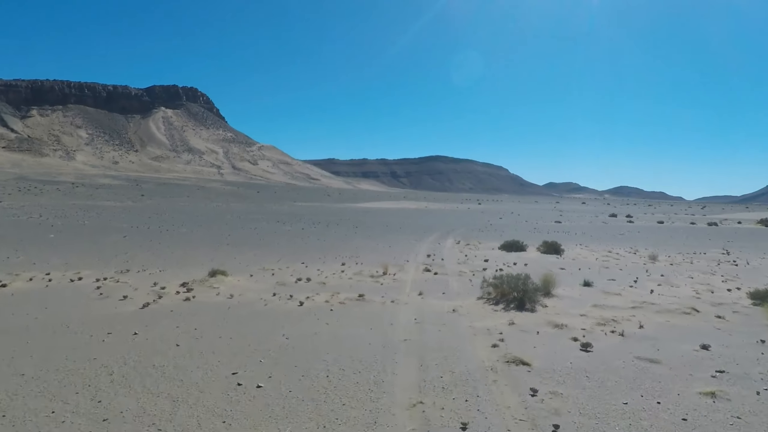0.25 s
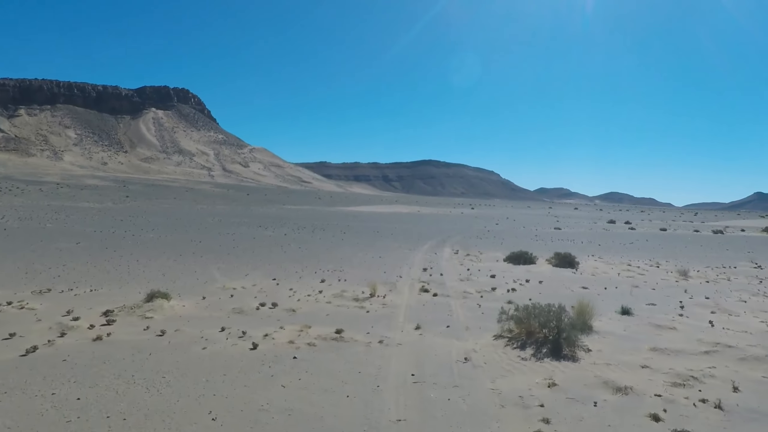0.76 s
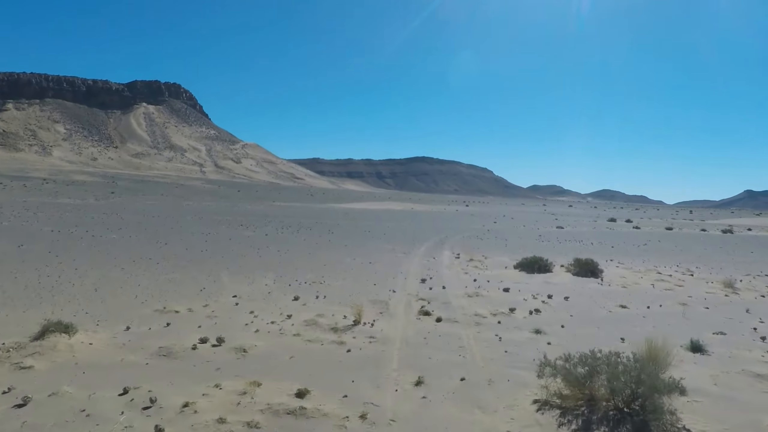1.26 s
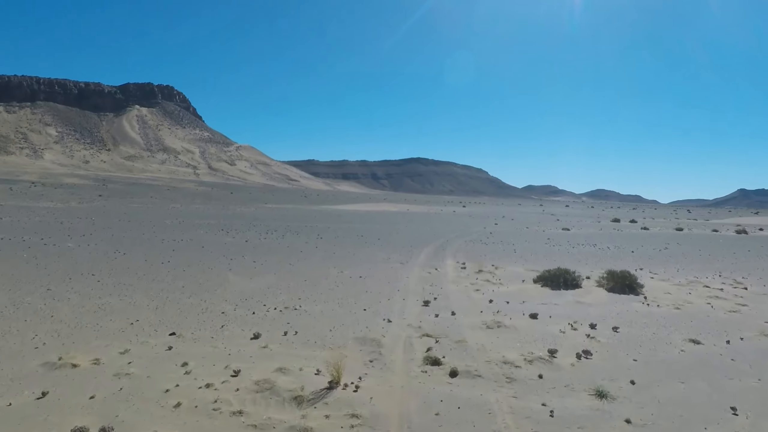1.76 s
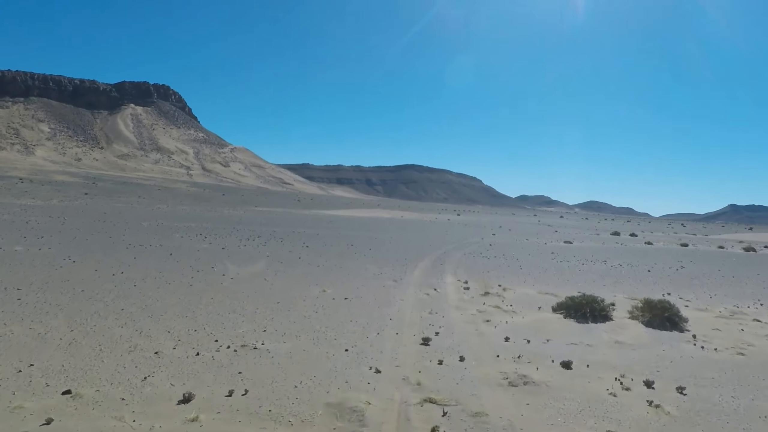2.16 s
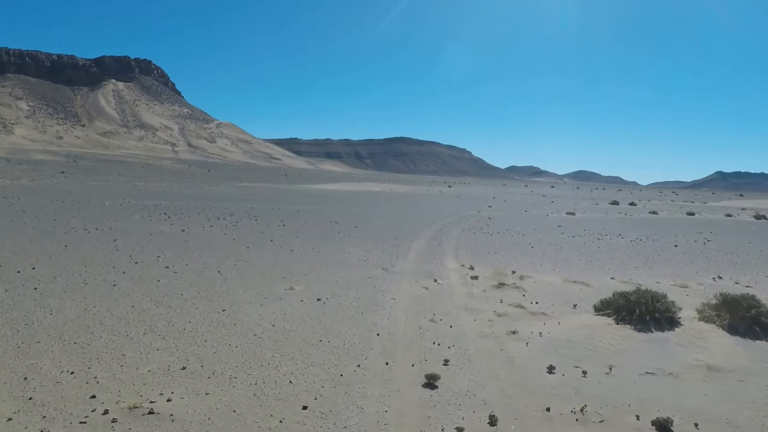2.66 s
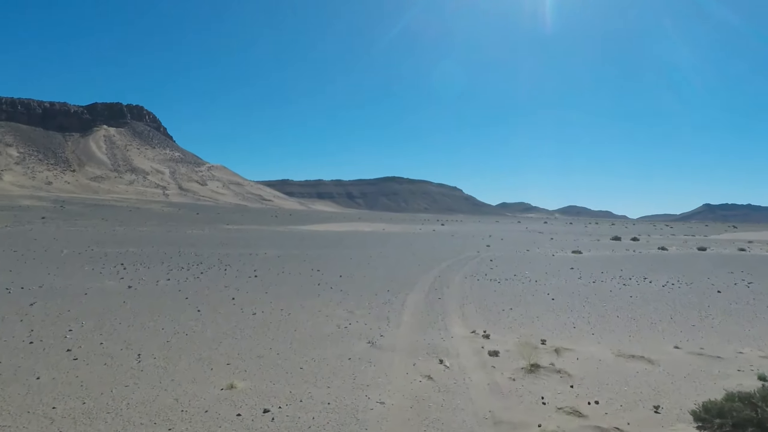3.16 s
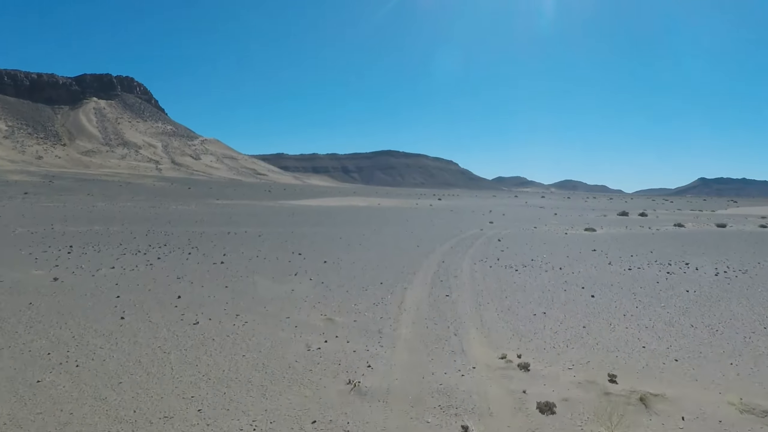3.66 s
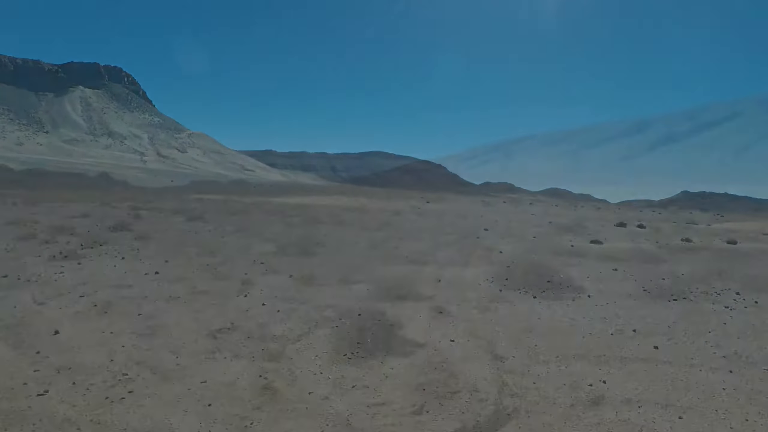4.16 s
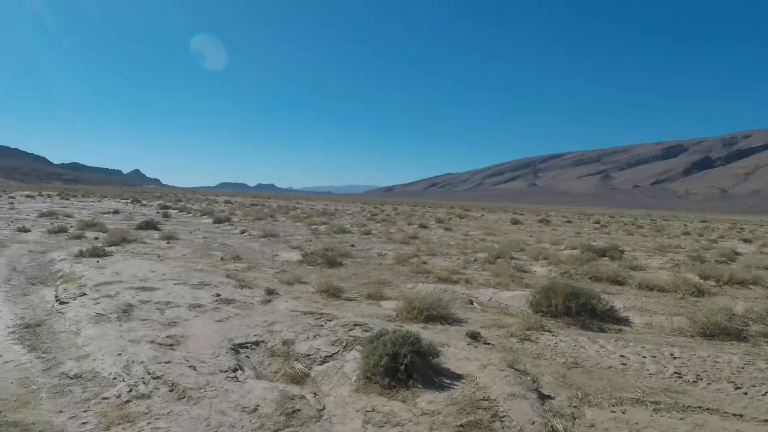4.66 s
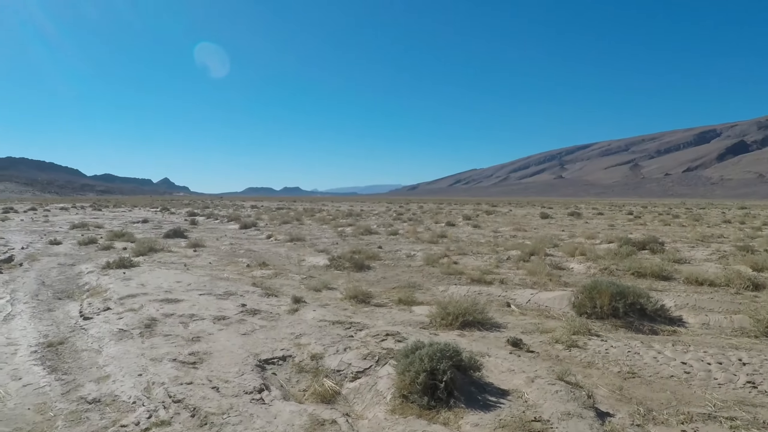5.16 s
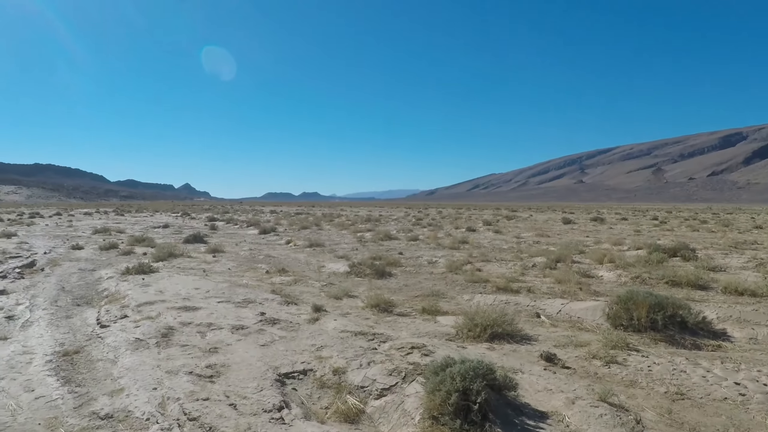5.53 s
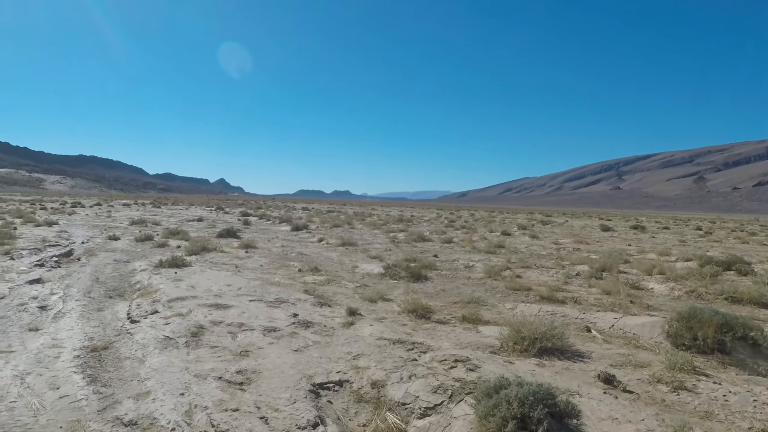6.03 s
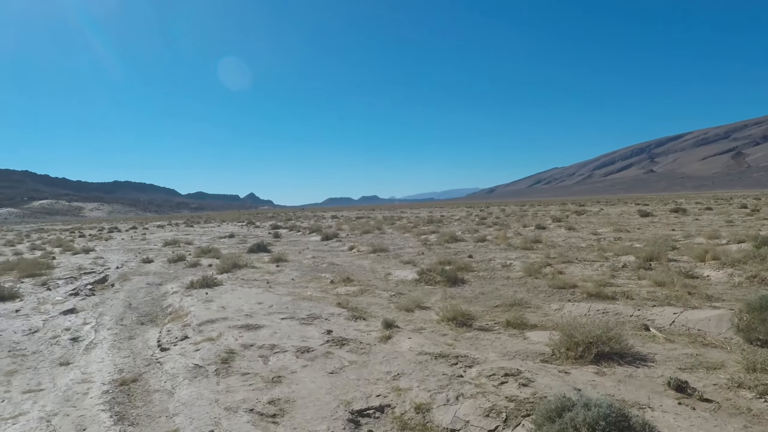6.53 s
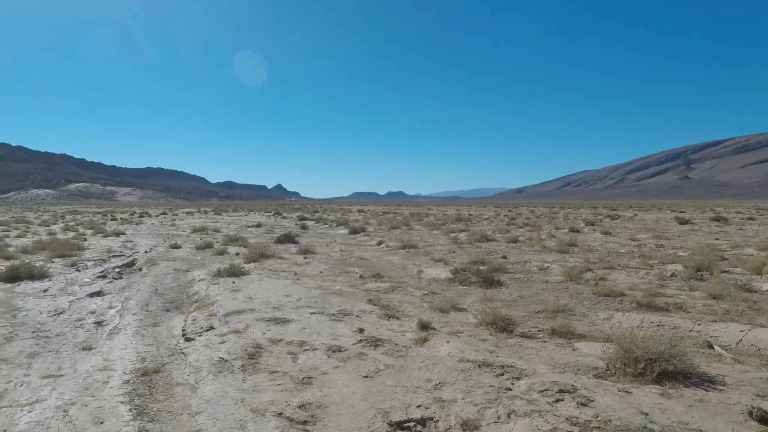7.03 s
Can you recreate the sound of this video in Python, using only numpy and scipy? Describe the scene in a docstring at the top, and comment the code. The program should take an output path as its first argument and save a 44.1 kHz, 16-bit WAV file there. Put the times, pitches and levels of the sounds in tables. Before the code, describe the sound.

A truck rolls over loose desert gravel, gritty crunching and stone knocks over heavy low boom, then quieter bumping with loose metal rattles and tiny tinks.

```python
"""On a desert track a truck rolls along, heard at its body: the cab booms as two low tones that later beat, the engine
hums as a sine, and gravel crunches under the tyres as grainy filtered noise with brighter bursts. Stones clunk the floor
pan as force through resonances; one squeals along the metal as a gliding tone. On slower, bushy ground the crunch
yields to a steady roar, a regular low thump, rattling panels and small metal tinks, which are short sines."""
import sys
import numpy as np
from scipy import signal
from scipy.fft import rfft, irfft, next_fast_len
from scipy.io import wavfile
from scipy.ndimage import uniform_filter1d, map_coordinates

SR = 44100
rng = np.random.default_rng(int(sys.argv[2]) if len(sys.argv) > 2 else 0)


def bounce(signal):
    """Save signal as a 16-bit WAV file at the path given by the first command-line argument."""
    frames = np.transpose(np.atleast_2d(signal))
    limited = np.clip(frames, -1, 1)
    pcm = np.round(limited * 32767).astype(np.int16)
    wavfile.write(sys.argv[1], SR, pcm)


N = 321489
T = np.arange(N) / SR  # s

# Cab boom, rms level: time_s, level_db
BOOM_LEVEL = [(0, -35.5), (.11, -26.5), (.23, -33.5), (.32, -26), (.72, -26.5), (.87, -37), (.99, -25.5),
              (1.3, -29.5), (1.37, -36), (1.41, -28.5), (1.59, -38), (1.73, -21.5), (1.81, -40),
              (1.96, -24.5), (2.25, -33), (2.34, -39), (2.45, -27.5), (2.68, -34.5), (2.77, -31),
              (3.12, -25.5), (3.2, -53), (3.28, -28.5), (3.44, -29.5), (3.56, -25.5), (3.82, -39),
              (3.9, -26.5), (4.3, -34), (4.7, -38), (5.1, -32), (5.9, -30.5), (6.5, -34), (6.9, -35),
              (7.29, -32.5)]
# Cab boom, mean pitch: time_s, pitch_hz
BOOM_PITCH = [(0, 41), (3.8, 41.01), (4.2, 42.27), (4.9, 37.6), (5.7, 40.94), (6.6, 39.52), (7.29, 39.36)]
# Second, lower boom, which opposes the first at each row, for deep or shallow dips: time_s, relative_level_db
BOOM_BEAT = [(3.95, -27), (4.1, -4), (4.25, -1), (4.43, -3.5), (4.6, -3), (4.775, 0), (5.045, 2.5),
             (5.24, -1), (5.5, -17), (5.78, -20), (6.1, -3), (6.355, -1.5), (6.605, 4.5), (6.92, 7),
             (7.22, 0.5), (7.5, -2)]
# Low frame judder, spectrum: frequency_hz, density_db_per_hz (relative)
JUDDER_SPECTRUM = [(4.7, -38.5), (8.0, -4.5), (32, 15), (42, -33.5), (70, -120)]
# Rumble above the judder, spectrum: frequency_hz, density_db_per_hz (relative)
RUMBLE_SPECTRUM = [(25, -24), (45, 8), (70, 0.5), (95, -12.5), (150, -17), (167, -21.5), (190, -24.5),
                   (330, -24.5), (450, -34), (540, -61)]
CALM_ROAR_DB = -60  # tyre roar on smooth ground
JUDDER_DB, JUDDER_GROWTH = -46, 1.34  # level on smooth ground; dB per dB of roar
RUMBLE_DB, RUMBLE_GROWTH = -48, 0.72  # the same for the rumble

# Tyre noise: time_s, crunch_level_db, roar_level_db
TYRE_LEVELS = [(0, -55.5, -58.5), (.38, -55, -58), (.93, -48, -57), (1.32, -50, -57), (1.58, -47, -53.5),
               (1.85, -50.5, -50), (2, -50, -56), (2.27, -53.5, -56), (2.44, -46, -52.5), (2.78, -45, -51),
               (3.02, -49, -47), (3.3, -50, -53), (3.42, -53.5, -53), (3.71, -48.5, -53),
               (4.22, -50, -57.5), (4.38, -52, -57.5), (4.52, -57.5, -62), (5.1, -61.5, -62.5),
               (5.48, -59.5, -61.5), (5.9, -60.5, -62), (6.6, -57.5, -60), (6.94, -60, -62),
               (7.29, -56.5, -60)]
# Loose gravel on the ground: time_s, loose_share (0-1)
LOOSE_GRAVEL = [(0.1, 0.35), (.7, 0.92), (4.4, 0.95), (4.65, 0.12)]
# Crunch on loose gravel, spectrum: frequency_hz, density_db_per_hz (relative)
GRAVEL_SPECTRUM = [(710, -41.5), (1200, -7.5), (1450, -3), (1750, -5.5), (2100, -6), (2950, -1.5),
                   (3300, -5.5), (3700, -6), (4200, -8), (4380, -18), (4700, -14), (5500, -22),
                   (6600, -31.5), (7050, -25.5), (7600, -32), (8450, -30.5), (9500, -38.5), (13600, -47.5),
                   (15600, -57.5)]
# Crunch on firmer dirt, spectrum: frequency_hz, density_db_per_hz (relative)
DIRT_SPECTRUM = [(710, -22.5), (1200, -12), (1440, -17.5), (1590, -1.5), (2050, -2.5), (2570, 5),
                 (3600, -7.5), (4300, -20.5), (5500, -16.5), (6700, -29), (13000, -34), (15600, -40)]
# Tyre roar, spectrum: frequency_hz, density_db_per_hz (relative)
ROAR_SPECTRUM = [(250, -41.5), (430, -5), (496, -10), (590, -2.5), (867, -0.5), (1060, 0), (1400, -6.5),
                 (1820, -42.5), (3080, -120)]
# Modes of the sheet-metal panels: pitch_hz, width_hz, level_db
PANEL_MODES = [(1605, 313, -9), (2140, 102, 3), (2479, 57, -1.5), (2780, 41, 13.5), (2876, 203, -4),
               (3140, 51, 16.5), (3336, 390, -20)]
# Modes of the floor pan: pitch_hz, width_hz, level_db
FLOOR_PAN_MODES = [(353, 320, -4.5), (561, 71, 0.5), (769, 90, -5.5), (897, 67, 2.5), (1109, 106, 2),
                   (1326, 143, 2.5)]

# Bigger stones bursting under the tread: start_s, peak_db (nominal)
CRUNCHES = [(0.008, -36), (0.7477, -44), (0.7749, -34.5), (0.8194, -36.5), (0.8769, -35.5), (0.9128, -46),
            (0.9622, -40), (1.046, -31.5), (1.08, -41), (1.1059, -46), (1.28, -36), (1.3359, -39),
            (1.4202, -43), (1.5078, -31.5), (1.693, -32.5), (2.0123, -37), (2.447, -35), (2.6449, -32),
            (3.0569, -32), (3.0874, -25.5), (3.3596, -50), (3.5154, -33), (3.5972, -37), (4.013, -33.5),
            (4.0994, -35), (4.2447, -38)]
# Stone burst, spectrum: frequency_hz, density_db_per_hz (relative)
BURST_SPECTRUM = [(900, -47), (1450, -0.5), (2000, -8.5), (2800, 0), (3250, -5.5), (3700, 1), (4200, -8.5),
                  (4450, -22), (5500, -20), (7000, -32), (12000, -47)]
BURST_CREST_DB = 9.5  # peak over rms
BURST_RISE_S, BURST_T60_S = 0.00059, 0.12

# Stones thrown against the underside; from 4.68 s, low floor-pan knocks, mostly under the rattles:
# start_s, peak_db, struck_part_hz, snap_relative_db
STONES = [(0.996, -36, 3050, -32), (1.468, -39, 2530, -25), (1.655, -34.5, 2562, -14.5),
          (1.66, -39, 805, -38), (1.7, -40.5, 1000, -36), (1.844, -30, 1020, -36), (1.876, -33, 640, -39),
          (2.219, -35.5, 1024, -40), (2.67, -44.5, 2796, -6), (2.78, -36.5, 1404, -29),
          (2.875, -27.5, 930, -34), (2.875, -33.5, 2940, -26), (3.074, -32.5, 895, -15.5),
          (3.083, -32, 2446, -21), (3.089, -27.5, 3300, -11), (3.099, -31, 3090, -11),
          (3.14, -35.5, 691, -36), (3.275, -49, 2917, -2.5), (3.357, -36, 1280, -32),
          (3.354, -38, 2300, -15), (3.528, -27, 1720, -26), (3.535, -26.5, 2180, -21),
          (3.552, -31, 2830, -24.5), (3.619, -41.5, 960, -12.5), (3.976, -40.5, 2770, -13),
          (4.006, -38.5, 1040, -16), (4.094, -44, 750, -30), (4.17, -52, 716, -26),
          (4.236, -37.5, 925, -19), (4.377, -48, 2800, -4), (4.68, -44, 1100, -35), (4.73, -47, 1045, -36),
          (5.345, -43.5, 1085, -36), (5.71, -48.5, 900, -30), (5.835, -45.5, 997, -35),
          (7.183, -46, 745, -36), (7.205, -46.5, 1150, -36)]
# Knocks of loose panels: start_s, peak_db, snap_relative_db
RATTLES = [(4.678, -41, -38), (4.7296, -41, -15.5), (4.77, -53, -24), (4.9484, -46.5, -13),
           (4.959, -42.5, -28), (4.987, -46, -17), (5.017, -46.5, -10), (5.0404, -42, -31),
           (5.069, -43.5, -22), (5.1537, -33.5, -18.5), (5.2677, -37.5, -28), (5.2908, -42, -23),
           (5.3413, -41.5, -15.5), (5.3697, -35.5, -18), (5.3985, -40, -18), (5.493, -41.5, -22),
           (5.5196, -44.5, -31), (5.7726, -42.5, -31), (5.8268, -41.5, -16), (6.144, -54, -2),
           (6.193, -40.5, -33), (6.2743, -39.5, -21.5), (6.3077, -45, -19.5), (6.367, -41, -21),
           (6.5414, -35, -20.5), (6.56, -38, -30), (6.6685, -35.5, -18), (6.86, -48, -14),
           (7.035, -53.5, -5), (7.055, -48, -9), (7.195, -45, -20.5), (7.2537, -42.5, -16.5)]
# Treble snap of a blow, spectrum: frequency_hz, density_db_per_hz (relative)
SNAP_SPECTRUM = [(3000, -38), (4500, 3.5), (7000, -4.5), (11000, -15), (16000, -13.5)]
STONE_T60_S = 0.19  # chatter of the force on a part at 1 kHz
STONE_T60_POWER = 0.39  # power of the pitch by which higher parts stop sooner
RATTLE_T60_S, RATTLE_HAZE_T60_S = 0.1, 0.06
# A snap is a sharp click and a softer haze
CLICK_T60_S, STONE_HAZE_DB, STONE_HAZE_T60_S = 0.016, -11, 0.11
STONE_STRIKE, RATTLE_STRIKE = 4.3, 7  # first contact, relative to the chatter

# Engine hum: time_s, pitch_hz, level_db
ENGINE = [(0, 60.9, -49.5), (1, 61.1, -47.5), (1.4, 62.4, -41.5), (1.62, 62.9, -31), (1.9, 63.4, -52),
          (2.5, 65.6, -39), (3, 66.8, -46.5), (3.6, 66.6, -49.5), (4.2, 67.9, -62), (4.5, 68.8, -71),
          (5.5, 70, -55.5), (6.4, 71.65, -50.5), (7.29, 71, -60)]
# Faint drive-line drone: time_s, pitch_hz, level_db
DRONE = [(0, 165, -77.5), (2.2, 165.2, -77), (2.6, 166.1, -64), (3.3, 166.6, -72.5), (3.9, 167.7, -66),
         (4.3, 166, -67), (4.6, 167.7, -77.5), (5.6, 168.3, -69), (6.4, 162.7, -71), (7.29, 163.8, -75.5)]

SQUEAL_START_S, SQUEAL_SWELL_S, SQUEAL_T60_S = 3.078, 0.019, 0.08
SQUEAL_DB, OVERTONE_DB = -27.5, -22  # mean level at the top of the swell; overtone relative to it
SQUEAL_HZ, SQUEAL_LOW_HZ, SQUEAL_FALL_HZ_PER_S = 3246, 2860, 17500

THUMP_TIMES = np.arange(4.56, N / SR, .1024)  # s

# Small loose metal parts: start_s, level_db (before the rise), pitch_hz
TINKS = [(1.929, -47, 5760), (3.73, -51, 5950), (4.951, -63, 10200), (5.02, -64, 10500),
         (5.121, -64, 10800), (5.191, -61.5, 10250), (5.671, -59.5, 7600), (6.095, -58, 7330),
         (6.14, -60, 12700), (6.267, -62, 8270), (6.37, -64, 14500), (6.466, -46, 3310),
         (6.931, -57.5, 7330), (6.99, -62, 4860), (7.05, -59.5, 7370)]
TICK_TOP_DB = -67  # limit on a tink's level when it sets the starting tick

# Weak rattles and tinks fall at random on the bushy ground
BUSHY_FROM_S = 4.6
FAINT_RATTLE_DB, FAINT_SNAP_DB, FAINT_TINK_DB = -57.5, -9, -71


def amp(db):
    """Decibel law: the amplitude gain of a level."""
    return 10 ** (np.asarray(db) / 20)


def unit(x):
    """Power normalisation: x at rms 1."""
    return x / np.sqrt(np.mean(x ** 2) + 1e-20)


def curves(rows):
    """Linear interpolation: one value per sample for each column after the time."""
    times, *columns = np.transpose(rows)
    return [np.interp(T, times, column) for column in columns]


def wobble(rate):
    """Band-limited random drift: a smooth curve through rate random knots a second."""
    knots = rng.standard_normal(int(N * rate / SR) + 4)
    return map_coordinates(knots, [T * rate])


def filtered(x, response):
    """Linear filtering: the spectrum of x times a response of frequency."""
    size = next_fast_len(N + SR // 2)
    gain = response(np.fft.rfftfreq(size, 1 / SR))
    return irfft(rfft(x, size) * gain, size)[..., :N]


def coloured(x, spectrum):
    """Spectral shaping: x weighted by dB points over log frequency, at rms 1."""
    f, db = np.transpose(spectrum)

    def response(hz):
        return amp(np.interp(np.log(hz + 1), np.log(f + 1), db, -120, -120))

    return unit(filtered(x, response))


def resonant(x, modes):
    """Modal superposition: parallel resonances of alternating sign, applied twice for dark valleys."""
    f = np.fft.rfftfreq(len(x), 1 / SR)
    once = 0
    for k, (hz, width, db) in enumerate(modes):
        resonance = 1j * f * width / (hz * hz - f * f + 1j * f * width)
        once = once + (-1) ** k * amp(db / 2) * resonance
    return irfft(rfft(x) * once ** 2, len(x))


def tone(hz):
    """Phase integration: a sine of rms 1 that follows a pitch curve."""
    return np.sqrt(2) * np.sin(2 * np.pi * np.cumsum(hz) / SR)


def patchy(x, depth_db, size=4):
    """Random modulation in time and frequency: patches of size x 172 Hz by about 23 ms."""
    cells = signal.stft(x, nperseg=256)[2]
    field = uniform_filter1d(rng.standard_normal(cells.shape), size=size, axis=0)
    field = uniform_filter1d(field, size=8, axis=1)
    return signal.istft(cells * amp(depth_db * unit(field)), nperseg=256)[1][:N]


def knock(modes, rise, t60, strike):
    """Impact excitation: a sharp contact and a short chatter of force through the modes, peak 1."""
    t = np.arange(16384) / SR
    decay = amp(-60 * t / max(t60, .01)) + 0.37 * amp(-60 * t / 0.011)
    force = (1 - np.exp(-(t / rise) ** 2)) * decay * rng.standard_normal(len(t))
    force[0] = strike
    ring = resonant(force, modes)
    return ring / np.abs(ring).max()


def add_at(out, start_s, event):
    """Superposition: an event summed into out from its start."""
    out[round(start_s * SR):][:len(event)] += event


def faint(count):
    """Uniform random arrivals over the bushy ground: rows of start_s, spread_db, share (0-1)."""
    draw = rng.random((count, 3))
    start_s = BUSHY_FROM_S + draw[:, 0] * (N / SR - BUSHY_FROM_S)
    return np.c_[start_s, 6 * (draw[:, 1] - .5), draw[:, 2]]


def cab():
    """Air-mode resonance and beating: two low tones boom; judder and rumble grow with the roar of the ground."""
    upper_turns = np.cumsum(curves(BOOM_PITCH)[0] + 1.254 * wobble(9.6)) / SR
    # the lower boom loses one whole turn from row to row, so the two oppose at each row
    lag_turns = np.interp(T, np.transpose(BOOM_BEAT)[0], np.arange(len(BOOM_BEAT)))
    upper = np.sin(2 * np.pi * upper_turns)
    lower = amp(curves(BOOM_BEAT)[0]) * np.sin(2 * np.pi * (upper_turns - lag_turns))
    boom = np.sqrt(2) * amp(curves(BOOM_LEVEL)[0]) * (upper - lower)

    rough_db = curves(TYRE_LEVELS)[1] - CALM_ROAR_DB
    judder_db = JUDDER_DB + JUDDER_GROWTH * rough_db
    rumble_db = RUMBLE_DB + RUMBLE_GROWTH * rough_db + 0.97 * wobble(25)
    judder = amp(judder_db) * coloured(rng.standard_normal(N), JUDDER_SPECTRUM)
    rumble = amp(rumble_db) * coloured(rng.standard_normal(N), RUMBLE_SPECTRUM)
    return boom + judder + rumble


def tyres():
    """Granular noise: stones crack in clumps under the tread, and looser gravel has a brighter, grainier crunch."""
    crunch_db, roar_db = curves(TYRE_LEVELS)
    loose = np.clip(curves(LOOSE_GRAVEL)[0], 0, 1)
    clumps_db = .6 * wobble(30) + 1.3 * wobble(120)

    struck = rng.random(N) < 700 / SR  # some 700 cracks a second
    crack_db = 3.5 * np.minimum(rng.exponential(size=N), 3)
    cracks = struck * rng.standard_normal(N) * amp(crack_db)
    stones = unit(rng.standard_normal(N) + 0.33 * unit(cracks))

    gravel = amp(clumps_db) * coloured(patchy(stones, depth_db=1.87), GRAVEL_SPECTRUM)
    dirt_db = 0.82 * clumps_db + 0.48 * wobble(7.4)
    dirt = amp(dirt_db) * coloured(patchy(stones[::-1], depth_db=2.5), DIRT_SPECTRUM)
    crunch = amp(crunch_db) * (np.sqrt(loose) * gravel + np.sqrt(1 - loose) * dirt)

    roar = coloured(patchy(rng.standard_normal(N), depth_db=1.5), ROAR_SPECTRUM)
    roar = amp(roar_db + 0.53 * clumps_db) * roar

    # the tyre noise also sets the sheet metal singing
    panels = resonant((0.056 + 0.078 * (1 - loose)) * crunch, PANEL_MODES)
    floor_pan = 0.16 * resonant(roar, FLOOR_PAN_MODES)
    return crunch + panels + roar + floor_pan


def crunches():
    """Fracture bursts: bright, gritty noise with a fast rise and an exponential decay as stones break."""
    envelope, t = np.zeros(N + SR), np.arange(SR // 4) / SR
    for start_s, peak_db in CRUNCHES:
        decay = amp(peak_db - BURST_CREST_DB - 60 * t / BURST_T60_S)
        add_at(envelope, start_s, decay * (1 - np.exp(-t / BURST_RISE_S)))
    grit = amp(0.95 * wobble(250))
    return envelope[:N] * grit * coloured(rng.standard_normal(N), BURST_SPECTRUM)


def blows():
    """Modal excitation by impact: stones and low knocks ring nearby modes, panels ring broadly, and all snap."""
    body, snaps = np.zeros(N + SR), np.zeros(N + SR)
    t = np.arange(SR // 4) / SR
    click = amp(-60 * t / CLICK_T60_S)

    stone_haze = amp(STONE_HAZE_DB - 60 * t / STONE_HAZE_T60_S) * (1 - np.exp(-(t / 0.0061) ** 2))
    stone_snap = click * (1 - np.exp(-t / 0.001)) + stone_haze
    for start_s, peak_db, part_hz, snap_db in STONES:
        # modes weaken with their distance in octaves from the struck part
        near = [(hz, 1.53 * width + 45, 0.5 * db - 18 * np.log2(hz / part_hz) ** 2)
                for hz, width, db in FLOOR_PAN_MODES + PANEL_MODES]
        t60 = STONE_T60_S * (part_hz / 1000) ** -STONE_T60_POWER
        add_at(body, start_s, amp(peak_db) * knock(near, 0.00045, t60, STONE_STRIKE))
        add_at(snaps, start_s, amp(peak_db + snap_db) * stone_snap)

    # the loose fit damps the panels, so their modes are broad
    broad = [(hz, 1.5 * width + 100, 0.5 * db + 1.92 * (hz < 1400))
             for hz, width, db in FLOOR_PAN_MODES[2:] + PANEL_MODES]
    rattle_haze = amp(-2.5 - 60 * t / RATTLE_HAZE_T60_S)
    rattle_snap = (click + rattle_haze) * (1 - np.exp(-t / 0.0017))
    weak = [(start_s, FAINT_RATTLE_DB + spread_db, FAINT_SNAP_DB - 12 * share)
            for start_s, spread_db, share in faint(count=14)]
    for start_s, peak_db, snap_db in RATTLES + weak:
        add_at(body, start_s, amp(peak_db) * knock(broad, 0.0004, RATTLE_T60_S, RATTLE_STRIKE))
        add_at(snaps, start_s, amp(peak_db + snap_db) * rattle_snap)

    treble = coloured(patchy(rng.standard_normal(N), depth_db=4.5, size=14), SNAP_SPECTRUM)
    return body[:N] + snaps[:N] * treble


def squeal():
    """Scraping friction: a rough falling tone and its overtone swell, then die, as a stone drags along metal."""
    t = np.clip(T - SQUEAL_START_S, 0, None)
    hz = np.maximum(SQUEAL_HZ - SQUEAL_FALL_HZ_PER_S * t, SQUEAL_LOW_HZ) + 80 * wobble(300)
    rise = np.minimum(t / SQUEAL_SWELL_S, 1) ** 2
    decay = amp(-60 * np.clip(t - SQUEAL_SWELL_S, 0, None) / SQUEAL_T60_S)
    roughness_db = 2.8 * wobble(250)
    return amp(SQUEAL_DB + roughness_db) * rise * decay * (tone(hz) + amp(OVERTONE_DB) * tone(2 * hz))


def engine():
    """Periodic excitation: a higher engine order hums, ever less steady, and a drive-line drone wavers above it."""
    hum_hz, hum_db = curves(ENGINE)
    drone_hz, drone_db = curves(DRONE)
    unsteady_hz = (.6 + .45 * T) * wobble(13)
    hum = amp(hum_db + 1.3 * wobble(10)) * tone(hum_hz + unsteady_hz)
    drone = amp(drone_db + 3.1 * wobble(8.4)) * tone(drone_hz + 2.48 * wobble(15))
    return hum + drone


def thump():
    """Impulse response of a damped resonance: a low push once a period, alternately weaker and stronger."""
    count = len(THUMP_TIMES)
    push_db = -1.5 * (-1.) ** np.arange(count) + 1.9 * rng.standard_normal(count)
    pushes = np.zeros(N)
    pushes[(THUMP_TIMES * SR).astype(int)] = amp(push_db)

    def response(f):
        resonance = 1j * f * 250 / (170 ** 2 - f * f + 1j * f * 250)  # 170 Hz, 250 Hz wide
        return resonance / (1 + 1j * f / 350) ** 2  # two low-pass poles at 350 Hz

    return amp(-8.5) * filtered(pushes, response)


def tinks():
    """Free decay of a single mode: small loose metal parts tick, then ring briefly at one high pitch."""
    out, t = np.zeros(N + SR), np.arange(SR // 4) / SR
    weak = [(start_s, FAINT_TINK_DB + spread_db, 9700 + 1400 * share)
            for start_s, spread_db, share in faint(count=5)]
    for start_s, level_db, hz in TINKS + weak:
        shiver = np.cumsum(.15 * rng.standard_normal(len(t)))  # loose contact blurs the pitch
        envelope = amp(level_db - 60 * t / 0.065) * (1 - np.exp(-t / 0.0038))
        add_at(out, start_s, envelope * np.sin(2 * np.pi * hz * t + shiver))
        tick_envelope = amp(min(level_db, TICK_TOP_DB) - 7.0 - 60 * t / 0.03)
        add_at(out, start_s, tick_envelope * np.diff(rng.standard_normal(len(t) + 1)))
    return out[:N]


def scene():
    """Linear superposition: all sources at one microphone."""
    near = cab() + tyres() + crunches() + blows() + squeal()
    return (near + engine() + thump() + tinks())[None]


def record(dry):
    """Band limitation: nothing passes at or above 15750 Hz."""
    return filtered(dry, lambda hz: hz < 15750)


dry = scene()
out = record(dry)
bounce(out)
```